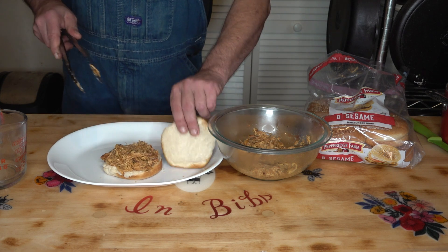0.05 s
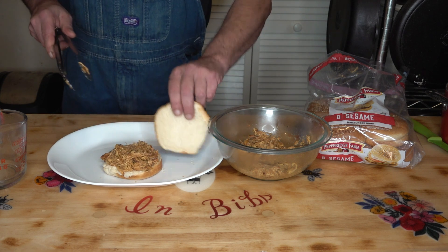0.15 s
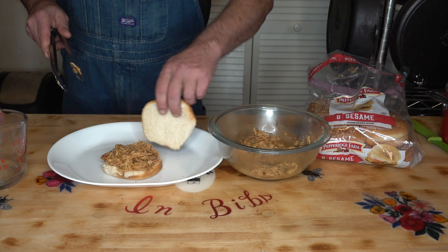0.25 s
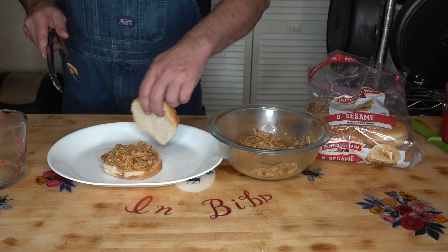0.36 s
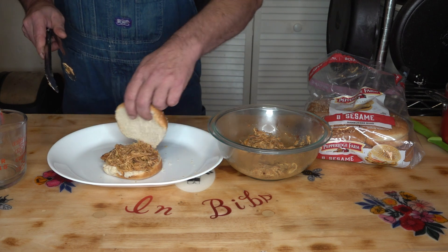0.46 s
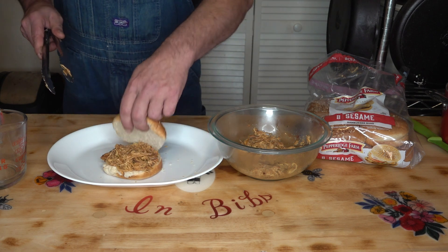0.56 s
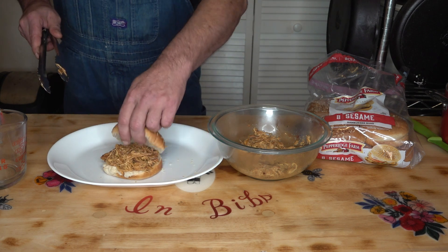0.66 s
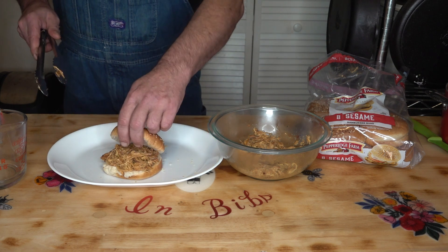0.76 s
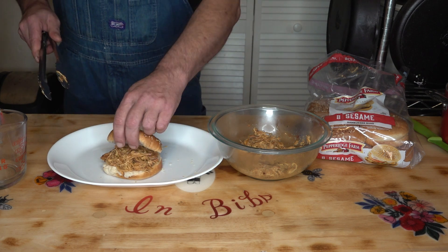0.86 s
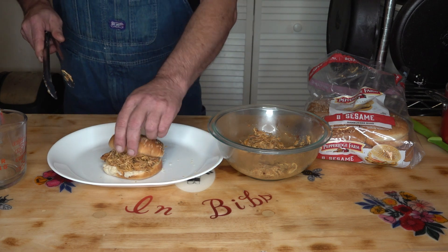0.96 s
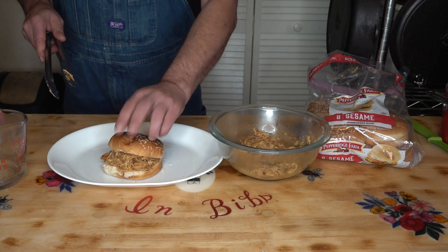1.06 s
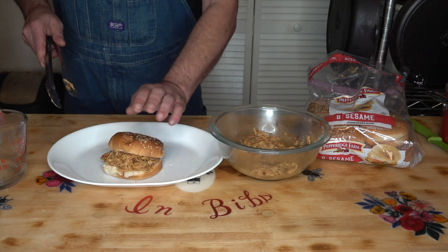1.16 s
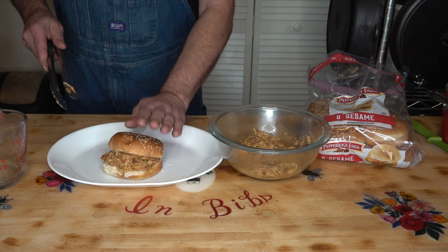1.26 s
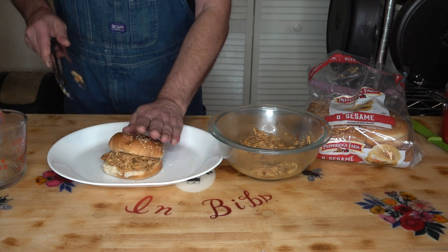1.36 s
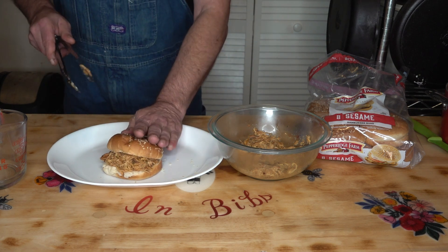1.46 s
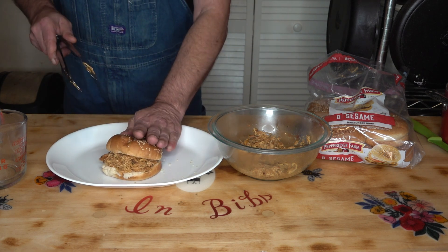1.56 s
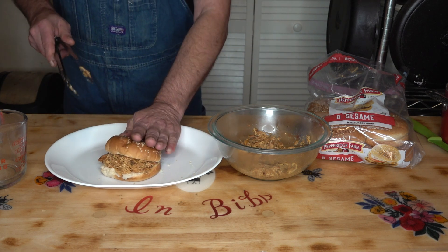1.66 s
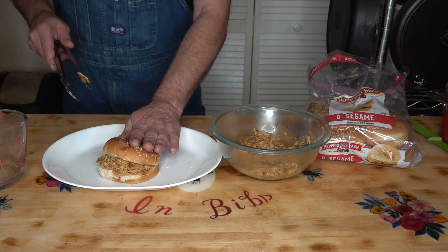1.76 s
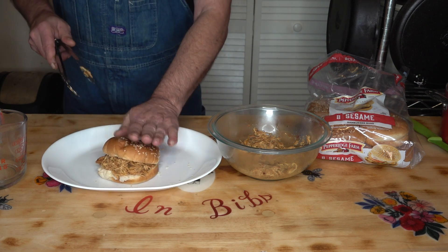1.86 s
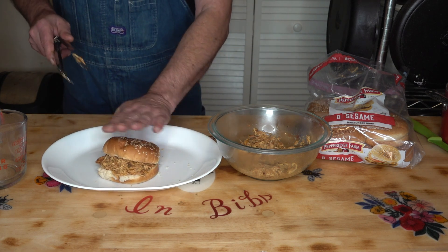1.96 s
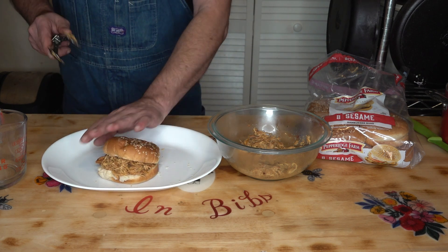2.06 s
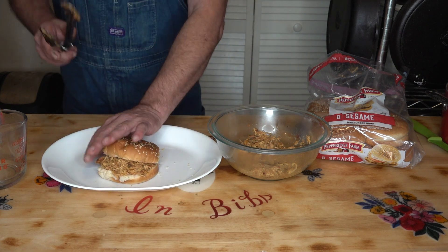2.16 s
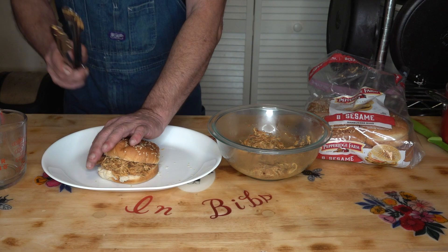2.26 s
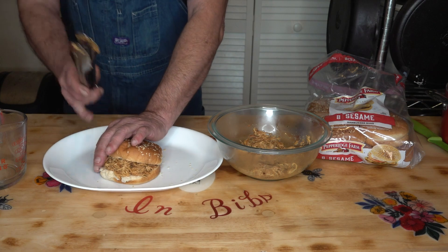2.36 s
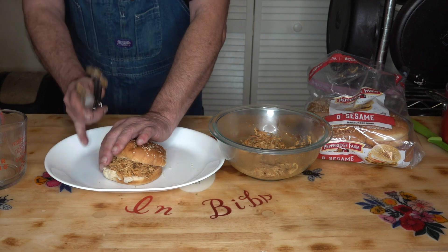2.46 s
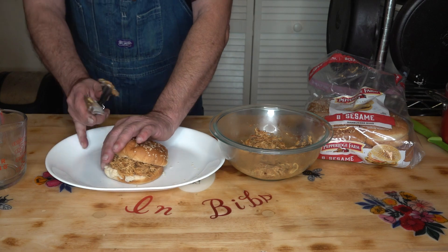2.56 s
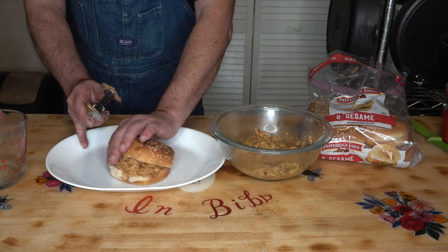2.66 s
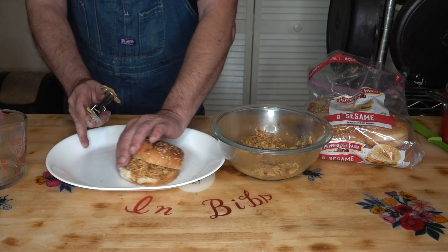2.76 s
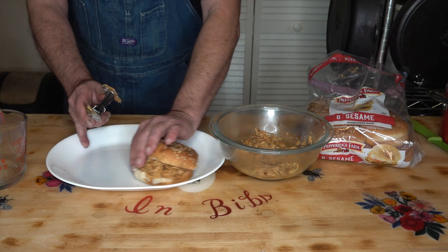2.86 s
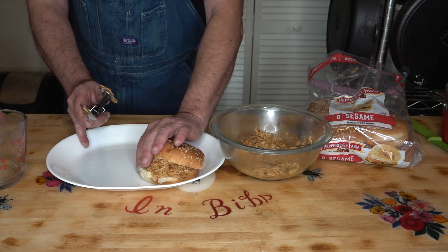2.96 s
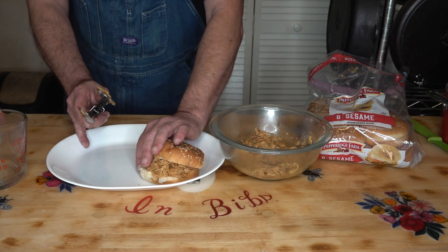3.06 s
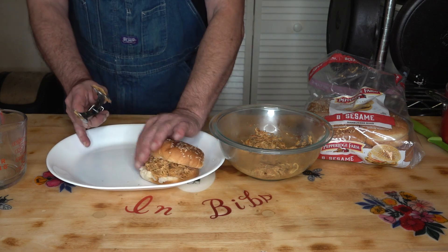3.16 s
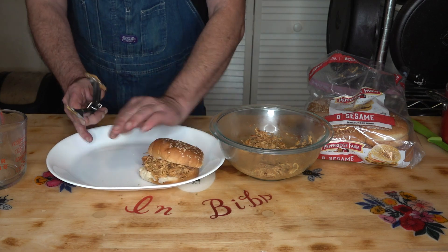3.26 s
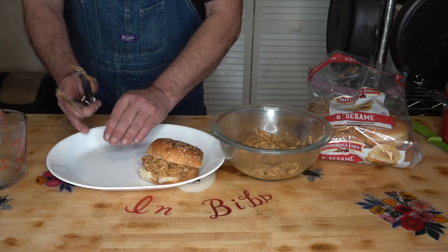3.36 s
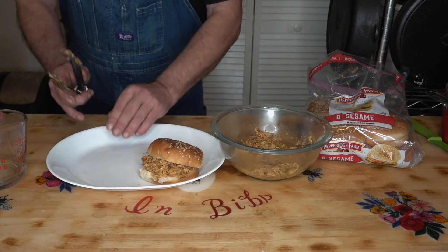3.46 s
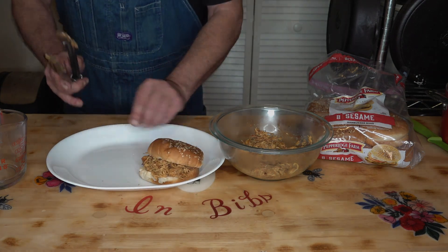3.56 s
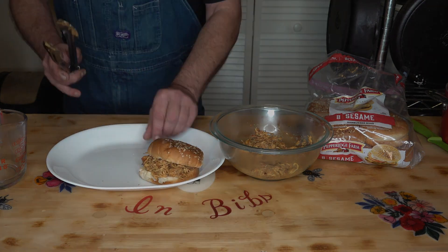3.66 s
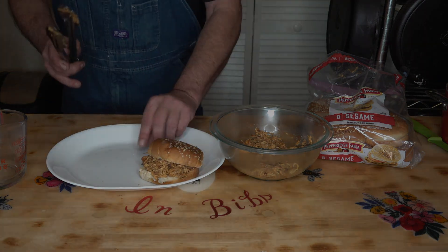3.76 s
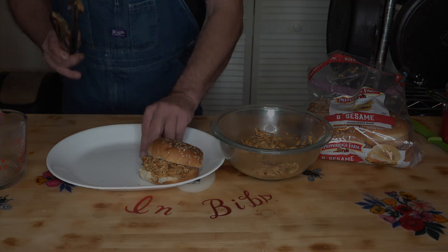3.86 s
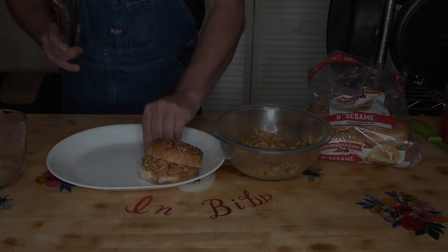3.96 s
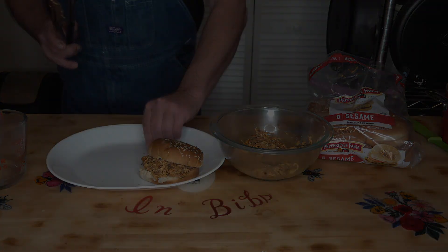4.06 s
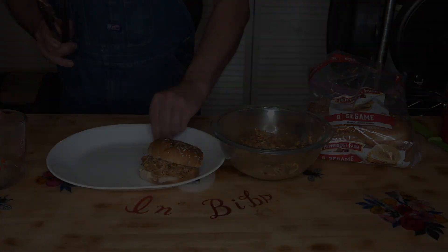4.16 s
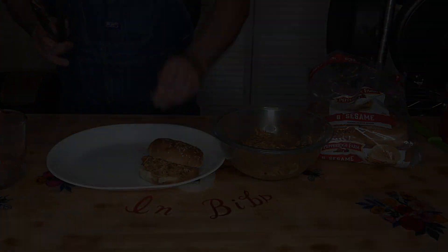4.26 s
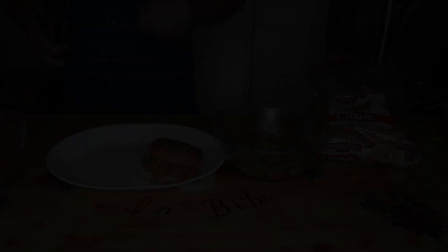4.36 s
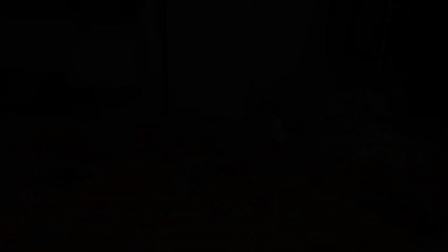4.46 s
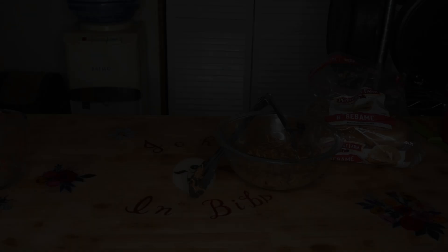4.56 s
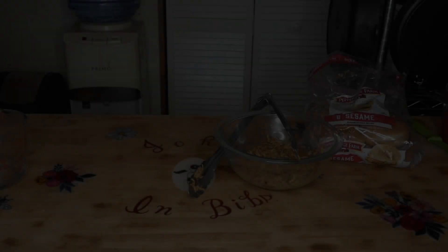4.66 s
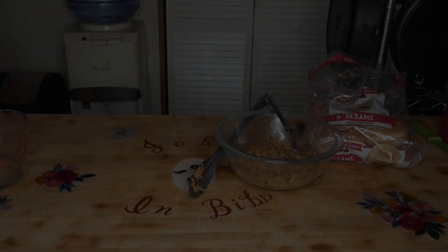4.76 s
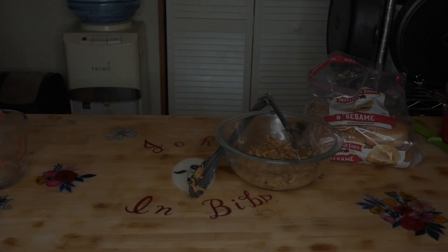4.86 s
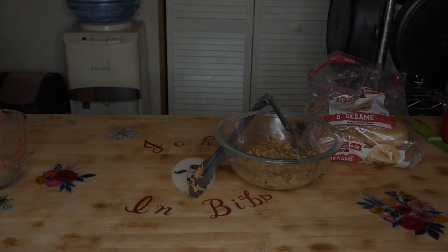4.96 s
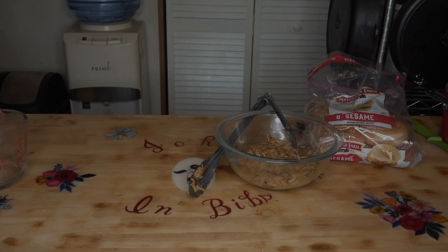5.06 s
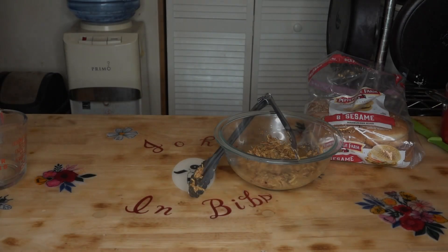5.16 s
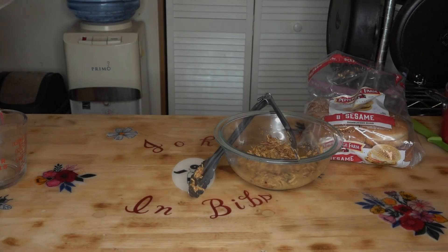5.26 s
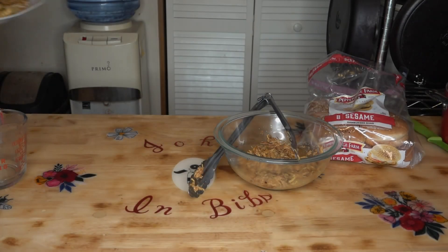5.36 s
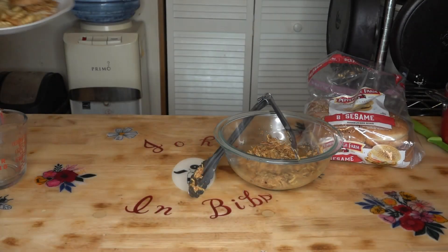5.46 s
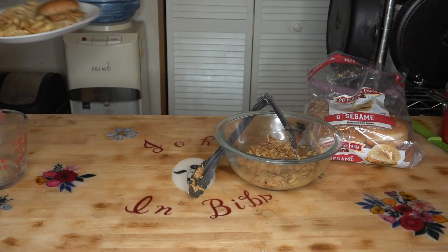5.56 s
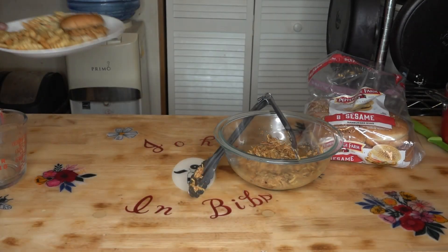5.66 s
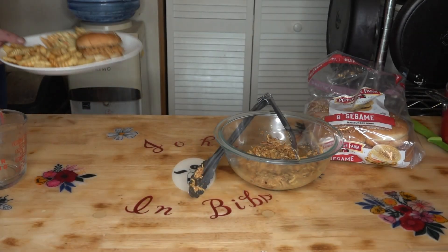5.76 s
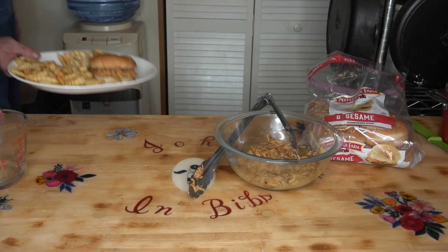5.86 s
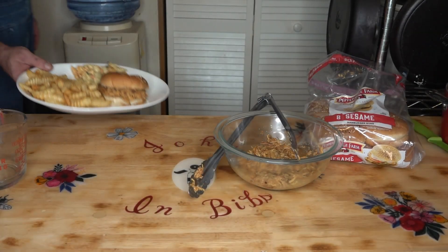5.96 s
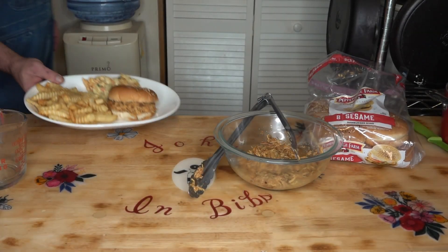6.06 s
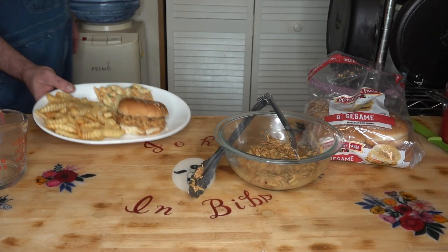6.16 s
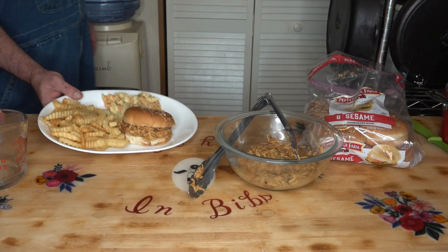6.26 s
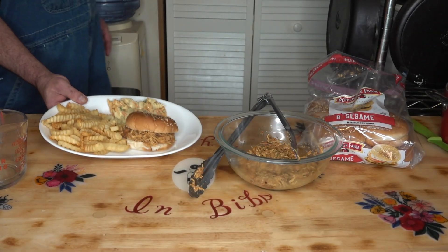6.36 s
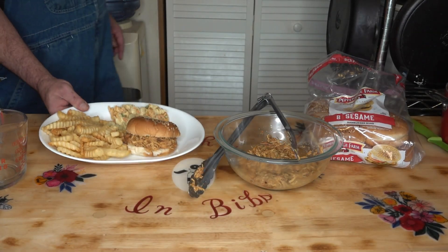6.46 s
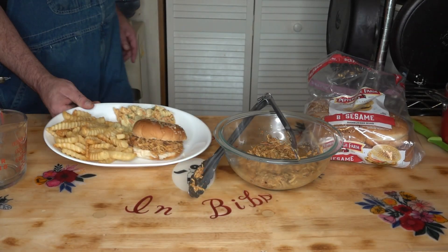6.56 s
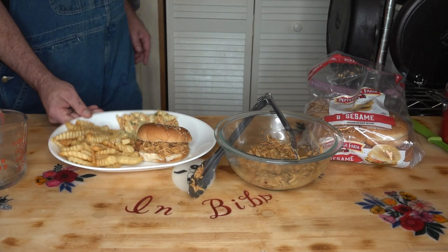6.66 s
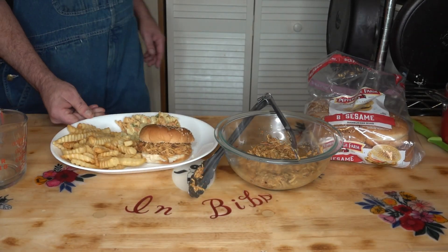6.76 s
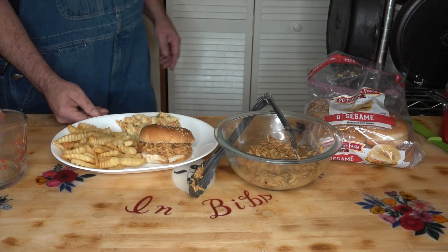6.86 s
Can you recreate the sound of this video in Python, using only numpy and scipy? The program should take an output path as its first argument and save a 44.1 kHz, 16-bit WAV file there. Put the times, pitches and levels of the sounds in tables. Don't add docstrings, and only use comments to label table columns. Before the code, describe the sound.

Quiet kitchen hum, faint steel hiss, sharp ceramic plate clatter on a wooden table, a brief fade to silence, then rustling, a hard knock and a heavy plate set-down.

```python
import sys
import numpy as np
from scipy import signal
from scipy.io import wavfile
from scipy.ndimage import uniform_filter1d

SR = 44100
rng = np.random.default_rng(int(sys.argv[2]) if len(sys.argv) > 2 else 0)


def put_to_file(sound):
    columns = np.atleast_2d(sound).T
    safe = np.clip(columns, -1, 1)
    whole_steps = np.round(safe * 32767)
    wavfile.write(sys.argv[1], SR, whole_steps.astype(np.int16))


def attenuation_scalar(level_db):
    decades = np.asarray(level_db, float) / 20
    return 10 ** decades


N = 304290
SPAN = SR // 2

HUM_HZ, HUM_DB, HUM_AFTER_DB, CHANGE_S = 105.1, -59, -64.5, 4.47
# f/Hz, width/Hz, rms level/dB
CASING = [(216.4, 20, -66), (334.7, 32, -63), (431, 30, -67.5), (114.5, 9, -66.5)]
# f/Hz, density level/dB
AIR_SPECTRUM = [(18, -55.5), (30, -27), (90, -10), (127, -9), (161, -10.5), (328, -6), (569, -13),
                (1190, -16.5), (1590, -26), (2680, -27.5), (3060, -39), (3770, -31.5), (8520, -39.5),
                (14000, -33.5), (16000, -38.5)]
# t/s, gain/1
DIP = [
    (0, 0.83),
    (3.47, 0.94),
    (4.47, 0),
    (5.47, 0.92),
    (6.9, 0.99),
]

# t/s, length/s, slip rate/Hz, level/dB, treble level/dB
CREAK_SLIPS = [(0.025, 0.016, 1440, -43.5, 6.5), (0.043, 0.0084, 1100, -45, -2.5),
               (0.053, 0.0086, 1300, -46, 2), (0.064, 0.0068, 1450, -35.5, 0.5),
               (0.073, 0.0076, 1300, -36, -8), (0.078, 0.01, 1050, -34, -8.5)]

# peak t/s, dull level/dB, bright level/dB, 20 dB rise/s, 20 dB fall/s
RUBS = [(0.078, -53.5, -55.5, .012, 0.14), (1.89, -63, -75.5, 0.37, .4), (2.92, -60.5, -68.5, 0.9, 0.22),
        (4.632, -81, -79, 0.17, 8.5), (4.922, -51.5, -50.5, 0.0658, 0.1), (5.002, -49.5, -54.5, 0.18, 0.22),
        (5.126, -60.5, -51.5, 0.13, .1), (5.334, -55.5, -64, 0.18, 0), (5.447, -35.5, -45.5, -0.01, 0.17),
        (5.489, -50, -43, 0.0475, 0.19), (5.599, -47.5, -52, 0.2438, 0.27), (5.7, -54.5, -54.5, 0.14, 0.18),
        (5.74, -60, -56.5, 0.11, 0.3), (5.865, -58.5, -58.5, 0.16, 0.35), (6.086, -38, -45.5, 0.005, 0.09),
        (6.05, -60, -59.5, 0, 2), (6.184, -39, -39.5, 0.0761, 0.09), (6.263, -43.5, -44.5, 0.16, 0.05),
        (6.33, -41.5, -54, 0.04, .3), (6.711, -29.5, -45.5, 0.1134, 0.36), (6.648, -22, -30, 0.03, 0.07),
        (6.78, -40, -49, -0.04, -2.2), (6.874, -36, -37.5, -0.2264, -0.3)]
# f/Hz, density level/dB
DULL_SPECTRUM = [(88, -42), (150, -4), (735, -1), (871, -7), (1070, 2.5), (1430, -6), (1690, -7),
                 (6000, -14), (7800, -20.5), (13200, -120)]
BRIGHT_SPECTRUM = [(1180, -38), (2000, -5.5), (2550, -6), (4230, -0.5), (6250, -11), (7910, -6),
                   (15100, -9.5), (16000, -5)]

# peak t/s, level/dB, 20 dB rise/s, 20 dB fall/s
GRIPS = [(0.2, -68, -0.1, .8), (0.91, -71, -0.5, 2), (0.99, -69, -0.6, 0.5), (1.25, -67, -0.2, 0.2),
         (1.46, -62, 0.08, .28), (1.79, -66, 0.2, 0.14), (1.901, -66, 0.3, 0.8), (3.05, -63, -0.6, .03),
         (3.25, -64.5, 0.22, 0.6), (3.5, -61.5, -0.02, 1.06)]
# f/Hz, level/dB
STEEL_SONG = [(3050, -3), (3500, -4), (3850, -2), (4150, 0), (4450, -2), (4750, -3), (5120, -6),
              (6500, -12), (7600, -16)]
# peak t/s,
# level/dB, 20 dB rise/s, 20 dB fall/s, f/Hz
SQUEAKS = [(0.6, -72, .2, .2, 4110), (3.5, -69, .03, .3, 4300), (3.62, -73, .2, .2, 3800),
           (3.6, -75, .15, .15, 9950), (3.54, -78, .1, .2, 10800), (1.5, -78, .05, .6, 6500),
           (6.51, -46, .012, .2, 780)]
# peak t/s, level/dB, 20 dB rise/s, 20 dB fall/s
SHOVES = [(1.5, -50, .02, .15), (1.54, -50, .03, .08), (1.89, -57, .1, .15), (2.68, -50, .03, .1),
          (6.628, -35, .005, .06)]

# t/s, strength level/dB, contact weight level/dB, contact hardness level/dB
TICKS = [(0.392, -39.5, -9, -9), (0.4614, -51, 0.5, -2), (0.8974, -56, 4, 5), (0.9792, -50.5, 17, 4),
         (1.1438, -47.5, 12, 4), (1.2244, -54, 3, 3), (1.4444, -58, 23, -3), (1.7744, -52, 11, -9),
         (3.956, -54, 4, -1), (2.4104, -46.5, -4, -1), (3.0455, -61, -2, 13), (3.895, -51.5, 3, 7),
         (4.6219, -48, -8, 1), (5.8102, -45, 0, 0), (5.8561, -41, -6, -1)]
TAPS = [
    (1.489, -37.5, 1, -14),
    (1.538, -43, 0.17, -13),
    (3.279, -23, 0.5, -0.5),
    (3.932, -44, 0.5, -6),
    (3.954, -48, 0.5, 3),
    (4.232, -20.5, 0.5, 3.5),
]
BUMPS = [(2.236, -47.5, -14, -3), (5.4395, -33, 5, -27), (5.604, -51, 5.5, -3), (6.418, -31, 0, -5),
         (6.481, -39, -25.5, 10), (6.503, -32, 0, -9), (6.554, -41, 0.5, -2), (6.58, -48.5, -2, 10)]
RIM_LANDINGS = [
    (2.457, -5, 1.5, -0.5),
    (2.606, -11.5, 7.5, -0.5),
]
TIPS_BACK = [
    (2.544, -7.5, 0, 0.5),
    (2.716, -50.5, -13, 0.67),
]
KNOCK = [(6.3093, -2.5, -16.5, 1)]
SET_DOWN = [
    (6.712, -21.5, -0.5, -6),
    (6.741, -36, -0.7, -6),
    (6.7563, -2, 0.8, 0.5),
]

# f/Hz, level/dB, T60/s
TONGS_MODES = [(4300, -8, .03), (5150, -4, .04), (5900, -6, .03), (6500, -5, .05), (7600, -4, .05),
               (7850, -4, .05), (8600, -8, .03), (9400, -8, .03), (10140, -3, .06), (11000, -6, .04),
               (11690, -3, .06), (12900, -9, .04), (13600, -7, .04), (14130, -6, .05)]
WOOD_MODES = [(378, -14, .09), (543, -6, .07), (670, 2, 0.052), (1023, -18.5, .05), (753.5, -4.5, .045)]
FURNITURE_MODES = [(561, -15.5, 0.14), (718, 1.5, 0.085), (788, -3, 0.18), (930, 0.5, 0.038),
                   (1040, -1, 0.057), (1286, -4.5, 0.083), (1340, -7, 0.06), (1787, -6.5, 0.13),
                   (3410, -12, 0.1), (4230, -13, 0.2)]
RIM_MODES = [(197, -22, .12), (393, -13, .15), (715, -15, .17), (975, -12, .16), (1176, -11, .16),
             (1334, -14, .12), (1434, 1.5, .12), (1606, -7, .14), (1776, -13, .16), (1949, -6, .12),
             (2490, -14, .16), (3558, -8, .13), (3930, -19, .09), (4705, -14, .1), (5539, -20, .1),
             (6522, -16, .1), (7215, -19, .08), (7800, -20, .07), (8900, -24, .1), (10950, -22, .07),
             (13900, -27, .08)]
TIP_MODES = [(395, -8, .17), (577, 0, .22), (632, -6, .17), (700, -1, .18), (980, -8, .15),
             (1448, -11, .12), (1940, -8, .12), (2482, -4, .15), (3155, -16, .08), (3849, -8, .05),
             (5850, -14, .03), (7181, -24, .055)]
FULL_MODES = [(252, -23, .13), (392, -7, 0.16), (549, -7, 0.14), (740, -2, 0.062), (784, -2, 0.15),
              (900, -6, 0.056), (1017, 1.5, .08), (1212, 2, 0.089), (1466, -4, .1), (1900, -14, 0.062)]

# lower f/Hz, upper f/Hz
PULSE_BANDS = [(300, 1315), (950, 1760), (2600, 5140), (6500, 15000)]
TONGS_CONTACT = (-28, -21.5, -2, -6)
WOOD_CONTACT = (-1.5, -11, -15.5, -49)
FURNITURE_CONTACT = (4, -3, -6.5, -23)
RIM_CONTACT = (-9, 1.5, -11.5, -22.5)
TIP_CONTACT = (-7, -3.5, 1, -13.5)
FULL_CONTACT = (0, -3, -6, -23)
HEAVY_SHARES = [(1, 0, 0, 0), (0, .15, 1, .15)]
LIGHT_SHARES = [(.1, 1, 0, 0), (0, 0, 1, -.3)]

# f/Hz, T60/s
KITCHEN_T60 = [(200, 0.25), (1000, 0.21), (4000, 0.28), (12000, 0.32)]
# delay t/s, level/dB
ECHOES = [(.0022, -6.5), (.0075, -10.5), (.012, -15)]
AIR_PATH_S = 0.0026


def rms_one(x):
    return x / np.sqrt(np.mean(x ** 2) + 1e-20)


def band(x, low_hz, high_hz):
    high_hz = min(high_hz, .45 * SR)
    return signal.sosfilt(signal.butter(2, [low_hz, high_hz], "band", fs=SR, output="sos"), x)


def at_hz(points, hz):
    table_hz, values = np.array(points)[:, 0], np.array(points)[:, 1]
    return np.interp(np.log(hz), np.log(table_hz), values)


def drift(rate_hz):
    r = np.exp(-80 * np.pi * rate_hz / SR)
    slow = signal.lfilter([1], [1, -2 * r, r * r], rng.standard_normal(N // 40 + 2002))[2000:]
    return np.interp(np.arange(N) / 40, np.arange(len(slow)), rms_one(slow))


def ring(clicks, hz, t60):
    r = attenuation_scalar(-60 / (t60 * SR))
    w = 2 * np.pi * hz / SR
    return signal.lfilter([0, np.sin(w)], [1, -2 * r * np.cos(w), r * r], clicks + 1e-18)


def coloured(spectrum, patchy_db):
    out, edges = 0, 25 * 2 ** np.arange(0, 9.6, .5)
    white = rng.standard_normal((2, N))
    for k, (low, high) in enumerate(zip(edges, edges[1:])):
        level_db = at_hz(spectrum, np.sqrt(low * high))
        if spectrum[0][0] < high and low < spectrum[-1][0]:
            out = out + attenuation_scalar(level_db + patchy_db * drift(11)) * band(white[k % 2], low, high)
    return rms_one(out)


def stroke(s, db, rise, fall):
    t = np.arange(N) / SR - s
    early = -t / max(rise, .003)
    climb = np.maximum(early, 5 * early - 4)
    return db - 20 * np.maximum(climb, t / max(fall, .01))


def room_noise():
    t, edges = np.arange(SPAN) / SR, 140 * 2 ** np.arange(0, 7.1, .5)
    white = rng.standard_normal((2, 4 * SPAN))
    noise, decay = [], []
    for k, (low, high) in enumerate(zip(edges, edges[1:])):
        noise.append(band(white[k % 2], low, high) * (1000 / low) ** 0.48)
        build_up = 1 - np.exp(-t / .006)
        decay.append(attenuation_scalar(-60 * t / at_hz(KITCHEN_T60, low)) * build_up)
    return np.array(noise), np.array(decay)


def kitchen(x, room, place, wet_db):
    noise, decay = room
    start = int(place * (noise.shape[1] - SPAN))
    tail = np.sum(noise[:, start:start + SPAN] * decay, axis=0)
    tail = attenuation_scalar(wet_db) * tail / np.sqrt(np.sum(tail ** 2))
    tail[0] = 1
    for lag, db in ECHOES:
        tail[int(lag * SR)] += attenuation_scalar(db)
    forerunner = attenuation_scalar(-23) * band(x, 600, 3100)
    airborne = np.pad(signal.fftconvolve(x, tail), (int(AIR_PATH_S * SR), 0))[:SPAN]
    return forerunner + airborne


def blows(table, contact_db, shares, modes, room, ring_db, spread_db, wet_db, dense_db):
    click, out = np.arange(SPAN) == 0, np.zeros(N + SPAN)
    pulses = []
    for low, high in PULSE_BANDS:
        pulse = band(band(click + 1e-18, low, high), .8 * low, 1.2 * high)
        pulses.append(-pulse * SR / (high - low) / 2)
    dying = rng.standard_normal(SPAN) * attenuation_scalar(dense_db - 60 * np.arange(SPAN) / SR / 0.23)
    pulses[3] = pulses[3] + band(dying, *PULSE_BANDS[3])
    rings = []
    for k, (hz, db, t60) in enumerate(modes):
        mode = band(ring(click, hz, t60), .6 * hz, 1.6 * hz)
        rings.append((-1) ** k * attenuation_scalar(db) * mode)
    chance, places = rng.normal(0, 1, (len(table), len(modes))), rng.random(len(table))
    for (s, db, *touch_db), luck, place in zip(table, chance, places):
        contact = attenuation_scalar(contact_db + np.array(touch_db) @ shares) @ pulses
        body = attenuation_scalar(ring_db + spread_db * luck) @ rings
        out[int(s * SR):][:SPAN] += attenuation_scalar(db) * kitchen(contact + body, room, place, wet_db)
    return out[:N]


def motor():
    base_db = np.where(np.arange(N) / SR < CHANGE_S, HUM_DB, HUM_AFTER_DB)
    level = attenuation_scalar(base_db + 1.5 + 1.4 * drift(7))
    return level * np.sin(2 * np.pi * np.cumsum(HUM_HZ + 0.071 * drift(4)) / SR)


def fridge_casing():
    drone = 0
    for hz, width_hz, db in CASING:
        drone = drone + attenuation_scalar(db) * rms_one(ring(rng.standard_normal(N), hz, 4.2 / width_hz))
    return drone


def still_air():
    return attenuation_scalar(-59.0) * coloured(AIR_SPECTRUM, patchy_db=1.5)


def hinge_creak():
    low, high = np.full((2, N), 1e-18)
    for s, length, rate, db, treble_db in CREAK_SLIPS:
        luck = rng.normal(0, 1, (2, 40))
        at = np.cumsum((1 + .07 * luck[0]) / rate)
        push = np.sin(np.pi * np.clip(at / length, 0, 1)) ** .5
        size = attenuation_scalar(db + 2.6 * luck[1]) * push
        slips = ((s + at) * SR).astype(int)
        low[slips] += size
        high[slips] += size * attenuation_scalar(treble_db)
    return attenuation_scalar(12.0) * band(low, 980, 3800) + attenuation_scalar(12.5) * band(band(high, 5900, 9100), 4100, 14000)


def rubbing():
    t, levels = np.arange(N) / SR, np.full((2, N), -140.)
    for s, dull_db, bright_db, rise, fall in RUBS:
        levels = np.maximum(levels, stroke(s, np.array([[dull_db], [bright_db]]), rise, fall))
    fall = 400 * t
    levels = np.maximum.accumulate(levels + fall, axis=1) - fall
    dull, bright = uniform_filter1d(attenuation_scalar(levels), size=100)
    grit = attenuation_scalar(2.2 * drift(64))
    wood = attenuation_scalar(-2.5) * dull * coloured(DULL_SPECTRUM, patchy_db=0.5)
    surface = attenuation_scalar(2.5) * bright * coloured(BRIGHT_SPECTRUM, patchy_db=3)
    return grit * (wood + surface)


def tongs_hiss():
    noise = rng.standard_normal((2, N))
    sing = 0
    for hz, db in STEEL_SONG:
        sing = sing + attenuation_scalar(db + 3 * drift(3.5)) * rms_one(ring(noise[0], hz, .09))
    hiss = rms_one(band(band(noise[1], 2900, 5400), 2500, 6000))
    level = attenuation_scalar(np.max([stroke(*row) for row in GRIPS], axis=0) - 4.0)
    return uniform_filter1d(level, size=800) * (hiss + attenuation_scalar(2.5) * rms_one(sing))


def tongs_ticks(room):
    return blows(TICKS, TONGS_CONTACT, LIGHT_SHARES, TONGS_MODES, room,
                 ring_db=-17, spread_db=4, wet_db=-8, dense_db=-22)


def squeaks():
    noise = rng.standard_normal(N)
    return sum(attenuation_scalar(stroke(*row)) * rms_one(ring(noise, hz, .15)) for *row, hz in SQUEAKS)


def plate_taps(room):
    return blows(TAPS, WOOD_CONTACT, HEAVY_SHARES, WOOD_MODES, room,
                 ring_db=-3, spread_db=1.5, wet_db=-10.5, dense_db=-20)


def shoves():
    rumble = rms_one(band(band(rng.standard_normal(N), 219, 750), 219, 750))
    return attenuation_scalar(np.max([stroke(*row) for row in SHOVES], axis=0)) * rumble


def furniture_bumps(room):
    light = blows(BUMPS, FURNITURE_CONTACT, HEAVY_SHARES, FURNITURE_MODES, room,
                  ring_db=-12.5, spread_db=1.0, wet_db=-6.5, dense_db=-15)
    hard = blows(KNOCK, FURNITURE_CONTACT, HEAVY_SHARES, FURNITURE_MODES, room,
                 ring_db=-20, spread_db=0.0, wet_db=-6.5, dense_db=-16)
    return light + hard


def rocking_plate(room):
    first = blows(RIM_LANDINGS[:1], RIM_CONTACT, HEAVY_SHARES, RIM_MODES, room,
                  ring_db=-11.5, spread_db=1.5, wet_db=-6.5, dense_db=-8.5)
    second = blows(RIM_LANDINGS[1:], RIM_CONTACT, HEAVY_SHARES, RIM_MODES, room,
                   ring_db=-18.5, spread_db=0.0, wet_db=-8, dense_db=-14.0)
    back = blows(TIPS_BACK, TIP_CONTACT, HEAVY_SHARES, TIP_MODES, room,
                 ring_db=-14, spread_db=1.3, wet_db=-6.5, dense_db=-17)
    return first + second + back


def full_plate(room):
    return blows(SET_DOWN, FULL_CONTACT, HEAVY_SHARES, FULL_MODES, room,
                 ring_db=-17, spread_db=1.0, wet_db=-9.0, dense_db=-15.5)


def scene():
    room = room_noise()
    dip = np.interp(np.arange(N) / SR, *np.transpose(DIP))
    tone = motor() + fridge_casing() + still_air()
    moves = hinge_creak() + rubbing() + dip * tongs_hiss()
    hits = tongs_ticks(room) + plate_taps(room) + furniture_bumps(room)
    hits += rocking_plate(room) + full_plate(room)
    return (moves + squeaks() + shoves() + dip * (hits + tone))[None]


def top_cut(x):
    return signal.sosfilt(signal.butter(12, 16510, fs=SR, output="sos"), x)


def record(dry):
    thin = signal.sosfilt(signal.butter(2, 50, "highpass", fs=SR, output="sos"), dry)
    rounded = .9 * np.tanh(thin / .9)
    mix = signal.sosfilt(signal.cheby2(10, 50, 16900, fs=SR, output="sos"), rounded)
    return top_cut(mix)


dry = scene()
out = record(dry)
put_to_file(out)
```